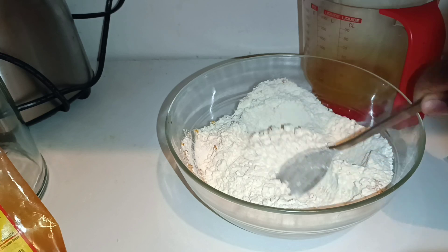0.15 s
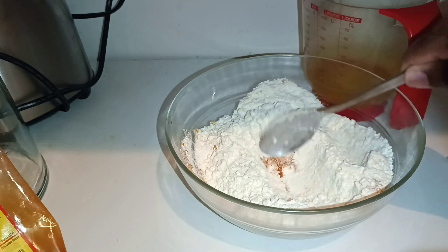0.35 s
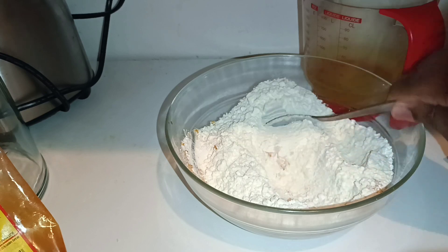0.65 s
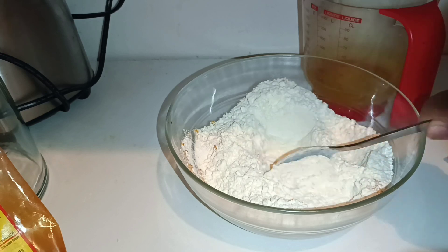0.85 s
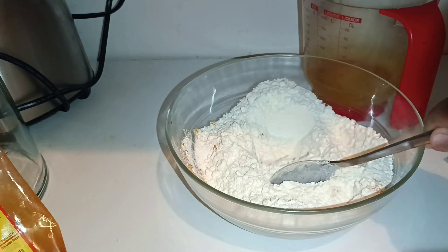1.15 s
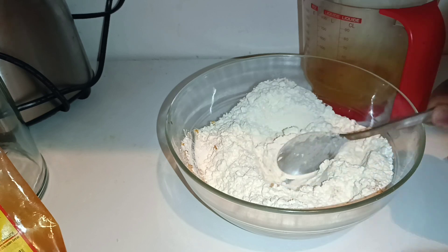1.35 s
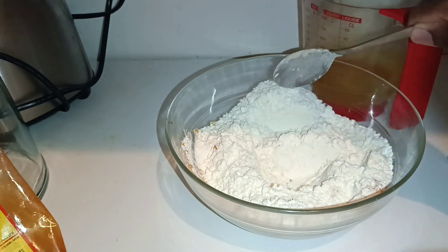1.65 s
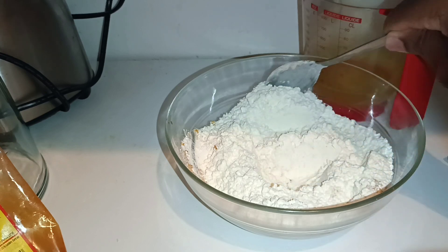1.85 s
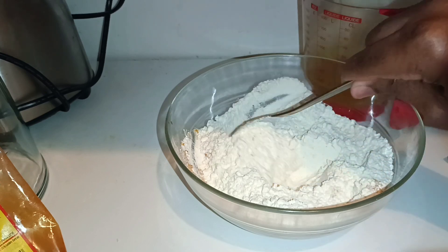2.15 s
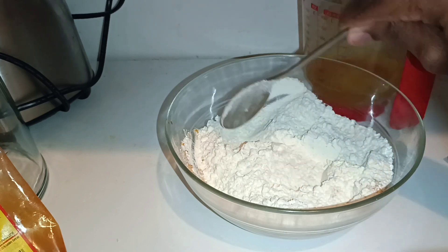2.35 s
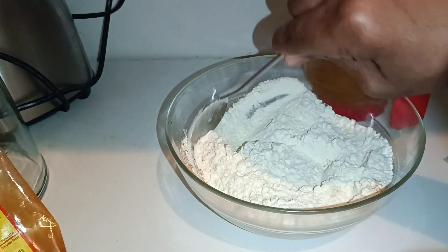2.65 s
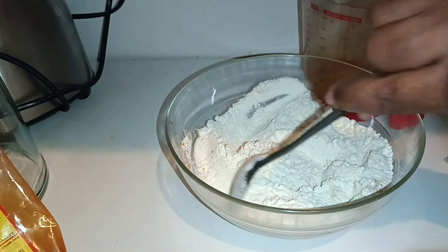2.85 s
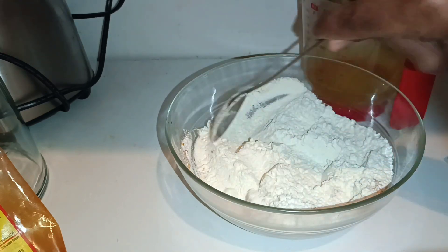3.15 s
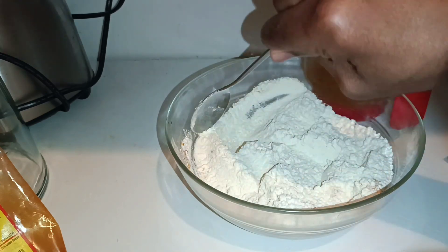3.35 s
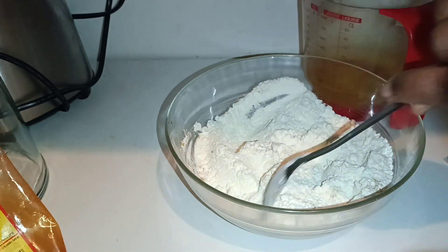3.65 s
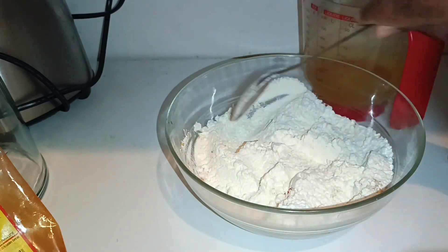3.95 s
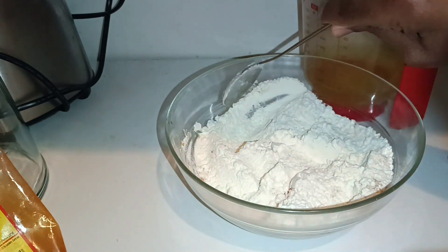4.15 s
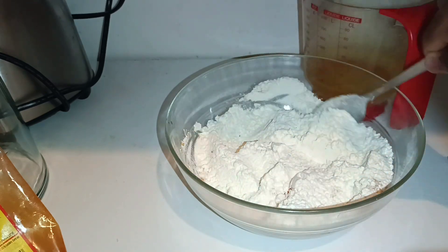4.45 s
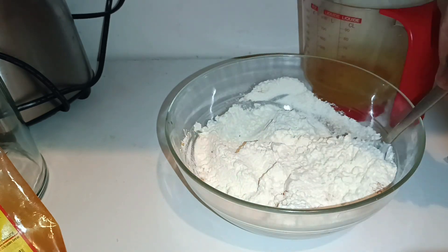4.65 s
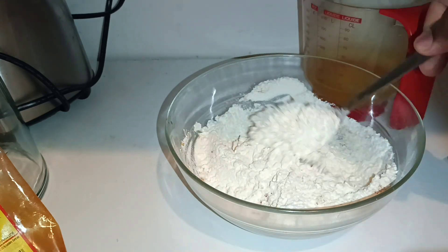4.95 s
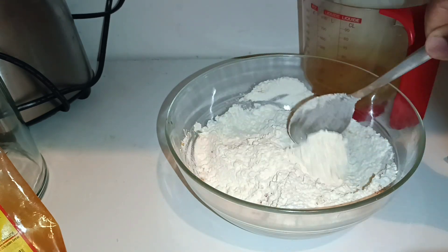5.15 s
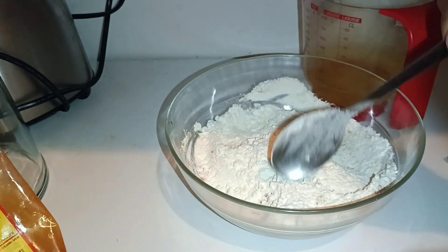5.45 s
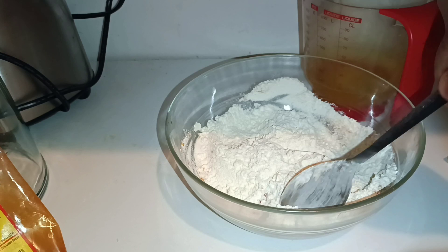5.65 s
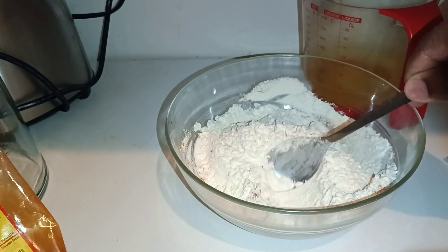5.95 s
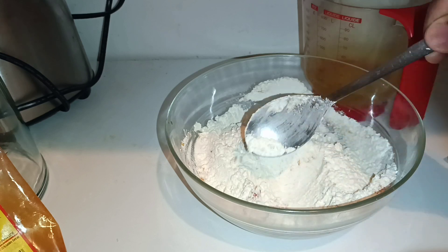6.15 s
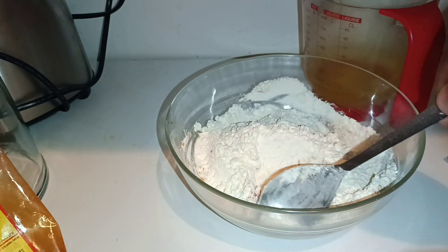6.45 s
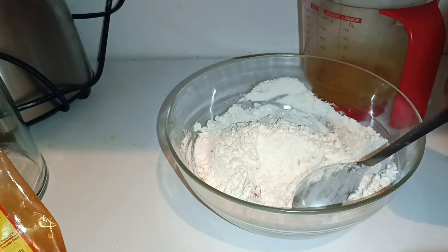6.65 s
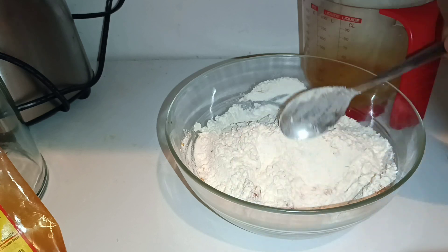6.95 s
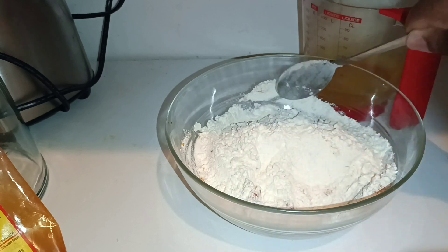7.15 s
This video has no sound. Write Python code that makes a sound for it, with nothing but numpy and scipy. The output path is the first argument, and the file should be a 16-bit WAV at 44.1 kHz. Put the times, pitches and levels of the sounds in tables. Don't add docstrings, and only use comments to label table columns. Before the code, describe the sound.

A quiet small kitchen with faint room air, hiss and a low fridge hum, recorded close in stereo, the right side duller. At 0.1 s a spoon digs into flour in a glass bowl: a cluster of soft low thumps and a muffled knock, with a dull drag at 0.2. Around 0.75 to 0.95 come another thump and dull gritty drags, then a softer push and scrape at 1.3. Thin, brighter scrapes rise at 1.9 to 2.2. At 2.65 a damped tap leads into a long wall scrape; at 3.4 to 3.7 light clinks and thin scrapes follow. At 4.25 the loudest clink rings with a thump and a harsh scrape, trailing into weighty drags and ticks until 4.85. Near quiet follows, with barely audible creaks. A soft thump and faint skim come at 5.8, then a loud ringing clink and thump at 6.5, a low drag to 6.8, and quiet to the end.

```python
import sys
import numpy as np
from scipy import signal
from scipy.fft import rfft, irfft
from scipy.io import wavfile
from scipy.ndimage import uniform_filter1d

SR = 44100
rng = np.random.default_rng(int(sys.argv[2]) if len(sys.argv) > 2 else 0)


def pcm_store(signal):
    levels = np.round(np.clip(np.atleast_2d(signal), -1, 1) * 32767)
    wavfile.write(sys.argv[1], SR, levels.astype(np.int16).T)


def how_loud(loudness_db):
    steps = np.asarray(loudness_db, float) / 20
    return 10 ** steps


N = 321930

# frequency in Hz, level in dB per Hz.
AIR_SPECTRUM = [(30, -39), (50, -16.5), (102, -1), (236, -2), (394, -5), (714, -11), (950, -15.5),
                (2600, -17.5), (7000, -35.5), (8200, -41), (10000, -40.5), (13600, -44), (15000, -22),
                (15800, -27.5)]
AIR_DB = -68.5
# frequency in Hz, likeness from -1 to 1.
AIR_LIKENESS = [(60, 0.16), (180, 0.57), (550, 0.086), (1650, -0.33), (4970, -0.14), (15000, 0.36)]
# frequency in Hz, left over right in dB.
AIR_LEAN = [(60, -4.5), (150, 2), (380, -1), (950, 0.5), (2380, 5.5), (5980, 1), (15000, -2)]
# frequency in Hz, level in dB.
FRIDGE_HUM = [(49.6, -87.5), (99.3, -76), (168, -86.5), (247, -78), (400, -83.5), (738, -90), (2228, -92.5),
              (2327, -93.5)]

# start in seconds, peak in dB, upper modes in dB, build-up in ms,
# damping factor.
THUMPS = [(0.087, -25, 13, 1.67, 0.78), (0.098, -29.5, 0.5, 7, 0.71), (0.119, -27, -17, 5.6, 1.5),
          (0.143, -40.5, 1, 4.1, 1.2), (0.182, -29.5, 7.5, 1.3, 0.77), (0.74, -25, 8, 15.6, 2.8),
          (0.779, -29, -8.5, 1.96, 1.16), (0.851, -51, -5, 11, 0.24), (0.915, -49.5, 8, 2, 1.3),
          (1.278, -40.5, 13, 11.6, 1), (1.31, -38, 1.5, 1.74, 0.48), (2.655, -31, 4, 34, 2.5),
          (2.686, -41.5, -17, 8.4, 2.1), (3.37, -30.5, -8, 11, 0.76), (3.405, -39, 2, 7.3, 0.96),
          (3.445, -48.5, -2, 5.4, 0.95), (4.247, -20.5, -5.5, 8.6, 2), (4.288, -31, -12, 4.2, 0.42),
          (4.538, -55, 24, 19.99, 2.7), (4.757, -46, -5.5, 2.9, 0.74), (5.802, -31.5, 15.5, 5.2, 0.99),
          (5.822, -35, -12.5, 12.5, 0.92), (6.511, -22, 18, 8.8, 1.6), (6.525, -27.5, 8.5, 4.5, 0.63),
          (6.545, -33.5, -5, 2.1, 0.54)]
# frequency in Hz, level in dB, t60 in seconds.
COUNTER_MODES = [(93, -10, .18), (125, -6.5, 0.11), (160.5, 8.5, 0.12), (216.5, -16, 0.13),
                 (238.8, -3, 0.15), (281.6, -3.5, 0.079), (345, -24, 0.15), (435, -17.5, 0.076),
                 (502.5, -20, 0.06)]
TOP_SHARE = 0.3

BOWL_HZ = [555, 618, 734, 964, 1050, 1172, 1852, 1992, 2019, 3015, 2961, 2989, 3413, 4137, 4450, 4934, 5448,
           5954, 6938, 7900, 8560, 9160, 10330, 11300, 12540]
# t60 in seconds, then dB when struck at the far, near and left wall.
BOWL_MODES = [(0.11, -12, -12, -14), (0.38, -12, -12.5, -9), (.21, -33.5, -16, -36), (0.18, -14, -20, 10),
              (0.1, -12.5, -33, -20), (0.27, -19.5, -8.5, 9), (0.0096, -21.5, -29, -13), (0.3, -11, 1, -31),
              (0.52, -1, -7.5, 13), (0.029, -9, -37, -41), (0.56, -15, -18.5, -28), (0.27, -16.5, -1, 3),
              (0.14, -29, -48, -14), (0.194, -17.5, -12, 8), (0.13, -25, -25, -28), (.3, -28, -62.5, -34),
              (0.17, -29, -32, 10.5), (0.25, -30.5, -52.5, -25), (0.6, -19, -54, -6),
              (0.074, -29, -49, -39), (0.21, -25, -49, -20), (0.13, -29, -33, -4), (0.07, -32, -40, 9),
              (0.4, -38.5, -85, -21), (.2, -35, -53, -18)]
# frequency in Hz, t60 in seconds, level in dB.
FLOUR_MODES = [(575, 0.36, -5), (832, 0.043, -3), (956, 0.24, -9), (1258, 0.47, -22.5), (1535, 0.056, -6)]
# frequency in Hz, t60 in seconds, level in dB.
RIM_MODES = [(630, 0.16, -17), (838, 0.12, -11), (930, 0.076, 0.5), (1280, 0.14, -12), (1600, 0.085, 1),
             (2304, 0.18, -8), (2584, 0.16, -1.5), (3550, .15, -8)]
# frequency in Hz, t60 in seconds, level in dB.
HANDLE_MODES = [(681, 0.15, 8), (1466, 0.17, -2), (2735, 0.23, -7), (2980, .15, -6), (4200, 0.126, -32),
                (5580, 0.091, -8), (6700, 0.13, -11)]
# frequency in Hz, level in dB per Hz.
CRACK_SPECTRUM = [(400, -30.5), (1000, -22.5), (2000, -11.5), (4000, -17), (7000, -25), (12000, -31.5),
                  (16000, -29.5)]

# start in seconds, peak in dB, tilt in dB per octave, damping factor,
# crack in dB. All blows and touches below share these columns.
DIGS = [
    (0.084, -30, -2, 19, -28),
    (0.742, -50.5, -1, 1.1, -3.5),
    (0.773, -47.5, 16, 3.3, -21),
    (0.916, -48, -3, 21, -9.5),
    (1.278, -54, -3.5, 0.47, 1.5),
    (5.798, -60.5, -12.5, 0.68, 7.5),
]
RIM_KNOCKS = [
    (0.179, -26.5, -10, 5.5, -3.5),
]
FAR_WALL = [
    (2.1265, -60, -0.5, 1.6, -8),
    (3.5005, -53, 12, 1.4, -19),
    (3.516, -43.5, 5, 2.4, -21),
    (3.637, -52, 9, 1.5, -16),
    (4.246, -13, 2.5, 1.2, -6),
    (4.765, -47.5, 4.5, 3.2, -1),
    (4.7893, -54, 5, 2.5, 4),
]
NEAR_WALL = [
    (6.507, -15, 0.12, 1.2, -3),
]
LEFT_WALL = [
    (2.6505, -49, 0.084, 6, -8.5),
    (3.368, -52, 5, 4.8, -7),
]
HANDLE_TOUCHES = [
    (0.173, -37.5, 0, 2, -7),
    (0.183, -34, 0, 1.8, -2.5),
]
FAR_TOUCHES = [
    (3.511, -55, 6.5, 2.7, 10),
    (4.674, -56, -6, 4, -4),
    (4.786, -67, -8, 3, -2),
]
NEAR_TOUCHES = [
    (6.514, -28.5, -8, 3.7, -12),
]

# frequency in Hz, width in Hz, level in dB.
BURIED = [(780, 82, 8), (1060, 78, -3), (1350, 480, -6), (1545, 46, -7), (2270, 1200, -17.5),
          (4200, 130, -10), (3230, 780, -25), (6740, 480, -16), (9750, 600, -23)]
HEAPED = [(680, 78, 16.5), (1300, 120, 6.5), (1690, 350, 2.5), (2660, 1400, -5.5), (4020, 290, -5),
          (6500, 1100, -16), (9567, 517, -30.5)]
LIFTING = [(1170, 110, -16), (1940, 110, -4), (2960, 160, -7), (4080, 84, -0.5), (6800, 180, -9.5),
           (8070, 90, -6), (8800, 124.6, -30), (10700, 100, -14)]
BARE = [(1218, 110, -3.5), (2000, 35, -1.5), (3000, 48, -2), (4150, 42, -4), (6170, 220, -19.5),
        (6960, 44, -19), (8840, 390, -26), (10500, 300, -21), (11260, 224, -25)]
RESTING = [(487, 27, 11), (1050, 160, -0.5), (2020, 20, -16.5), (2980, 210, 2), (4020, 110, 5.5),
           (5630, 170, -8), (6240, 200, -10.5), (8560, 60, -10.5), (4630, 70, -7), (5950, 80, -7.5),
           (9050, 80, -15.5), (10380, 110, -9.5), (12560, 80, -13)]
LOADED = [(740, 116, 2.5), (990, 174, 5), (1143, 110, 0.5), (1590, 160, 4.5), (3020, 350, 3.5),
          (3729.1, 140, 13), (4950, 67, 11), (5730, 98.4, -2), (6470, 350, 2.5), (10000, 290, -3)]
TIP = [(1122, 75, 7.5), (1830, 82, 7), (2995, 200, 7), (3910, 160, 4), (5900, 60, -18), (6600, 150, -12)]
SKIMMING = [(1213, 27, 2), (9200, 76, -26), (11330, 60, -17)]
SETTLED = [(522, 102, -8), (1210, 40, -13.5), (2090, 27, -29), (2989, 5.2, 16), (4100, 33, 1.5),
           (5800, 380, -17), (9130, 72, -16)]
RISING = [(3000, 90, -7), (3940, 280, -4.5), (5850, 81, -11), (6350, 160, -9), (10430, 240, -12)]

# start in seconds, length in seconds, share of the stroke before full
# pressure, scrape in dB, weight of the low drag in dB. All strokes share these columns.
BURIED_STROKES = [
    (.2, 0.11, .05, -80, 27),
    (.76, 0.2, 0.29, -66.5, 13.5),
    (.87, 0.073, 0.25, -68.5, -4),
]
HEAPED_STROKES = [
    (1.27, 0.14, 0.28, -68.5, 3.1),
    (1.308, 0.12, 0.37, -62, 3.3),
]
LIFTING_STROKES = [
    (2.01, 0.14, 0.41, -63.5, -9),
    (2.052, 0.15, 0.24, -61.5, 1.5),
]
BARE_STROKES = [
    (2.729, 0.3, 0.17, -62.5, -1),
    (2.898, 0.057, 0.46, -81, 5),
    (3.461, 0.079, 1, -54.5, -10.5),
    (3.521, 0.25, 0.13, -66, -4),
    (3.609, 0.16, 0.14, -64, -15),
]
RESTING_STROKES = [
    (4.26, 0.17, 0.08, -39, -1.5),
    (4.38, 0.264, 0.1, -54.5, -3),
]
LOADED_STROKES = [
    (4.51, 0.22, 0.23, -54, 7.6),
    (4.602, 0.138, 0.86, -62.5, 12.2),
]
TIP_STROKES = [
    (4.727, 0.11, 0.51, -47.5, 0),
]
SKIMMING_STROKES = [
    (5.795, 0.14, 0.077, -77, 6.2),
]
SETTLED_STROKES = [
    (6.53, 0.15, 0.16, -65, 22),
    (6.602, 0.18, 0.21, -63.5, 9),
]
RISING_STROKES = [
    (1.871, 0.18, 0.74, -61, -13),
]
# rise of pitch over a stroke in %, treble in dB, ring of the glass in dB.
HANDLING = [
    (2.5, -10, -28),
    (6, -10.5, -21.5),
    (0, -7, -0.5),
    (0.5, -10, -19),
    (-3, -14, 0),
    (1.5, -13.5, -12.5),
    (-3, -40, -15),
    (7.5, 1.5, -3),
    (1.4, -9, -3.5),
    (13, -17.5, -9),
]
ONSET_DB, RELEASE_DB = -13.5, -27
HOLD = 1.334
STEEL_HZ = [5700, 6300, 6700, 7900, 8300, 8600, 9150, 9900, 10350, 11300, 11850, 12700, 15100, 15500]
# time in seconds, boost in dB, length in ms, pitch in Hz.
CATCHES = [(.775, 12, 7.4, 1400), (0.821, 6.5, 9.2, 1180), (.825, 9, 20, 4200), (.875, 8, 30, 4150),
           (.83, 0, 28, 1700), (.89, 16, 27, 1800), (1.282, 1, 8, 2300), (1.31, 11, 12, 7500),
           (1.357, 11.5, 8, 1450), (1.36, 1, 6.5, 6800), (2.032, 6, 24, 4000), (2.076, 0, 11, 3000),
           (1.9, 13, 13, 5800), (1.97, 4, 25, 3900), (2.04, 17, 22, 3000), (2.944, 19, 14, 1290),
           (3.505, 10, 8, 1170), (4.674, 5, 6.5, 1050), (4.58, 5.5, 20, 990), (4.63, 8.5, 17, 950),
           (2.13, 27, 12, 1190), (2.153, 16, 8, 2000), (2.79, 7, 23, 2000), (2.76, 6, 14, 4150),
           (2.805, 7, 13, 3000), (2.79, 15, 23, 10500), (2.87, 0, 19, 6200), (2.9, 19, 48, 9200),
           (3.497, 24, 15, 4430), (3.515, 19, 9, 9200), (3.55, 10, 24, 3000), (3.62, 8, 8.5, 4150),
           (3.64, 2, 8.1, 3000), (3.675, 7, 11, 4150), (4.32, 0.5, 6.9, 3000), (4.423, 11.5, 13, 1024),
           (4.421, 5, 16, 3194), (4.546, 1, 6.4, 1510), (4.556, 10.5, 6, 1600), (4.56, 4, 22, 5500),
           (4.53, 11, 18, 9750), (4.599, 14, 5.9, 1190), (4.654, 6, 8, 910), (4.68, 12.5, 20, 1120),
           (4.68, 17.5, 28, 4370), (4.697, 8, 18, 1110), (4.715, 3.5, 6.3, 1100), (4.764, 12, 8.7, 2290),
           (4.788, 16, 5.1, 2170), (4.82, 21.5, 8, 1800), (5.801, 20, 7.5, 10000), (3.7, 0, 25, 3000),
           (.21, 8, 20, 3500), (6.63, -1.5, 14, 6100), (6.69, 6, 11, 9000)]
BITE = 0.87
CATCH_OCTAVES = 0.45

# start in seconds, peak in dB, pitch in Hz, length in ms.
CREAKS = [
    (.395, -68, 2640, 22),
    (2.25, -64.5, 732, 43),
    (4.82, -63, 416, 39),
    (5.28, -67, 2890, 81),
    (5.47, -68, 2616, 107),
    (5.75, -60.5, 680, 35),
    (6.82, -59.5, 404, 38),
    (6.88, -67.5, 2665, 36),
]
# frequency in Hz, t60 in seconds.
ROOM_DECAY = [(100, 0.18), (500, 0.28), (2000, 0.18), (6000, 0.24), (14000, 0.23)]
# frequency in Hz, level in dB.
PORT_COLOUR = [(6000, -0.5), (7050, -0.5), (7500, -6), (7950, -4), (9500, 3), (11500, -2), (13200, -7.5),
               (15200, 6)]
# frequency in Hz, loss in dB.
RIGHT_SHADE = [(100, 0), (350, 0), (600, 5), (1200, 0), (2400, 3.5), (4400, 19), (8100, 34), (12000, 22),
               (15500, 8)]
MASK_DB, MASK_SPREAD_DB = 31, 3
EDGE_HZ = 15670


def evened(x):
    return x / np.sqrt(np.mean(x ** 2) + 1e-20)


def peaked(x, peak_db):
    return how_loud(peak_db) * x / abs(x).max()


def read(points, hz):
    f, value = np.transpose(points)
    return np.interp(np.log(hz + 1), np.log(f + 1), value)


def colour(x, points):
    hz = np.fft.rfftfreq(len(x), 1 / SR)
    return irfft(rfft(x) * how_loud(read(points, hz)), len(x))


def add(mix, s, sound):
    part = mix[round(s * SR):][:len(sound)]
    part += sound[:len(part)]


def air():
    frames, hz = N // 512 + 5, np.fft.rfftfreq(2048, 1 / SR)
    a, b, c, d, patches = rng.standard_normal((frames, 1025, 5)).T
    patches = evened(uniform_filter1d(uniform_filter1d(patches, 14, 0), 8, 1))
    swell = evened(uniform_filter1d(rng.standard_normal(frames), 25))
    same = np.clip(read(AIR_LIKENESS, hz), -1, 1)[:, None]
    left = a + 1j * b
    right = same * left + np.sqrt(1 - same ** 2) * (c + 1j * d)
    lean = np.array([.5, -.5])[:, None, None] * read(AIR_LEAN, hz)[:, None]
    drift = 1.3 * patches + 2.5 * swell * (hz < 140)[:, None]
    z = np.array([left, right]) * how_loud(read(AIR_SPECTRUM, hz)[:, None] + lean + drift)
    wash = how_loud(AIR_DB) * evened(signal.istft(z, nperseg=2048, noverlap=1536)[1][:, :N])
    t = np.arange(N) / SR
    hum = np.zeros(N)
    for f, db in FRIDGE_HUM:
        waver = rng.standard_normal(40)
        level_db = db + np.interp(t, np.linspace(0, t[-1], 40), waver)
        hum += how_loud(level_db) * np.sin(2 * np.pi * f * t + waver[0])
    return wash + np.sqrt(2) * hum


def ring(hz, t60, db, rise_ms, rattle_db, settle=1, early_db=0, scatter=1):
    t = np.arange(SR // 2) / SR
    turn = .5 + scatter * rng.random((len(hz), 1))
    knots = rng.standard_normal((len(hz), 40))
    rattle = np.array([np.interp(t, np.linspace(0, .5, 40), row) for row in knots])
    level_db = db[:, None] - 60 * (t / t60[:, None]) ** settle
    level_db += rattle_db * np.minimum(t / 0.068, 1) * rattle
    level_db += early_db * np.exp(-(t / 0.022) ** 2)
    modes = how_loud(level_db) * np.sin(2 * np.pi * (hz[:, None] * t + turn))
    return modes.sum(0) * (1 - np.exp(-(t * 1000 / rise_ms) ** 2))


def chatter(ms):
    t = np.arange(5000) / SR * 1000
    landing = t / ms * np.exp(-t / ms)
    shiver = how_loud(-30.5) * np.minimum(t / ms, 1) * np.exp(-t / 22)
    contacts = rng.standard_normal(5000) * how_loud(2.6 * rng.exponential(1, 5000))
    return contacts * (landing + shiver)


def strikes(events, hz, t60, mode_db, rise_ms, chatter_ms, dull_db=0, rattle_db=2.4, early_db=7):
    out = np.zeros(N)
    for s, db, tilt_db, damping, crack_db in events:
        tilted_modes = mode_db + tilt_db * np.log2(hz / 2000)
        body = ring(hz, t60 / damping, tilted_modes, rise_ms, rattle_db, early_db=early_db)
        add(out, s - .002, peaked(body, db))
        tilted_crack = [(f, d + (tilt_db + dull_db) * np.log2(f / 2000)) for f, d in CRACK_SPECTRUM]
        crack = colour(chatter(chatter_ms), tilted_crack)
        add(out, s - .002, peaked(crack, db + crack_db))
    return out


def clinks():
    hz, (t60, far_db, near_db, left_db) = np.array(BOWL_HZ), np.transpose(BOWL_MODES)
    digs = strikes(DIGS, *np.transpose(FLOUR_MODES), 3.9, 14.6)
    rim = strikes(RIM_KNOCKS, *np.transpose(RIM_MODES), 5.7, 1.6)
    far = strikes(FAR_WALL, hz, t60, far_db, 2.9, 4.5, rattle_db=-2.0, early_db=13.0)
    left = strikes(LEFT_WALL, hz, t60, left_db, 5.4, 16.5)
    near = strikes(NEAR_WALL, hz, t60, near_db, 2.7, 2.15, dull_db=-7.5, rattle_db=-6.0, early_db=8.0)
    return digs + rim + far + left + near


def thumps():
    out, (hz, mode_db, t60) = np.zeros(N), np.transpose(COUNTER_MODES)
    upper = (hz > 190) * np.where(hz > 310, TOP_SHARE, 1)
    for s, db, upper_db, ms, damping in THUMPS:
        push = ring(hz, t60 / damping, mode_db + upper_db * upper, ms, 6.9, settle=0.84, scatter=0)
        add(out, s - .004, peaked(push, db))
    return out


def touches():
    hz, (t60, far_db, near_db, _) = np.array(BOWL_HZ), np.transpose(BOWL_MODES)
    handle = strikes(HANDLE_TOUCHES, *np.transpose(HANDLE_MODES), 1.35, 2.1)
    far = strikes(FAR_TOUCHES, hz, t60, far_db, 5.7, 3.8)
    near = strikes(NEAR_TOUCHES, hz, t60, near_db, 1.5, 3.4, dull_db=-8.0, early_db=20.0)
    return handle + far + near


def resonate(x, hz, width, order=1):
    turn = np.exp(2j * np.pi * np.cumsum(hz * np.ones(len(x))) / SR)
    r = np.exp(-np.pi * max(width, 3) / SR)
    return 2 * (turn * signal.lfilter([(1 - r) ** order], np.poly([r] * order), x / turn)).real


def wander(count, ms):
    width = round(ms * SR / 40000)
    coarse = uniform_filter1d(uniform_filter1d(rng.standard_normal(400), width), width)
    return np.interp(np.arange(count) / 40, np.arange(400), evened(coarse))


def snags(t, hz):
    nearby = [c for c in CATCHES if t[0] - .03 < c[0] < t[-1] + .03]
    s, db, ms, near_hz = np.transpose(nearby + [(0, 0, 1, 1000)])[:, :, None]
    coarse = t[::24]
    late = (coarse - s) * 1000 / ms * np.where(coarse < s, BITE, 1)
    octaves = np.log2(hz / near_hz) / CATCH_OCTAVES
    return np.interp(t, coarse, (db * np.exp(-late ** 2 - octaves ** 2)).sum(0))


def stroke(start, length, share, scrape_db, weight_db, load, glide, treble_db, ring_db):
    t = np.arange(0, length, 1 / SR)
    n, now = len(t), start + t
    away = np.interp(t / length, [0, np.clip(share, .02, .98), 1], [-1, 0, 1])
    pressure_db = scrape_db + np.where(away < 0, ONSET_DB, RELEASE_DB) * abs(away) ** HOLD
    grit = rng.standard_normal(n) * how_loud(2.2 * rng.exponential(1, n) + 1.3 * wander(n, 4))
    spoon = np.zeros(n)
    for f, width, db in load:
        hz = f * (1 + np.linspace(-.5, .5, n) * glide / 100 + 0.012 * wander(n, 38))
        tone = resonate(grit * how_loud(snags(now, f)), hz, 1.6 * width, order=2)
        spoon += how_loud(db + 3.2 * wander(n, 20)) * tone
    glass = np.zeros(n)
    for f, (t60, far_db, _, _) in zip(BOWL_HZ[5::2], BOWL_MODES[5::2]):
        tone = evened(resonate(grit * how_loud(snags(now, f)), f, 43.0 / t60))
        glass += how_loud(far_db + 2 * np.log2(f / 2000)) * tone
    steel = np.zeros(n)
    for f in STEEL_HZ * rng.uniform(.99, 1.01, len(STEEL_HZ)):
        steel += how_loud(4 * wander(n, 25) + snags(now, f)) * resonate(grit, f, 100, order=2)
    sound = evened(spoon) + how_loud(ring_db) * evened(glass) + how_loud(-13.0) * evened(steel)
    sound += how_loud(-35) * evened(grit)

    def band(low_hz, high_hz):
        sos = signal.butter(3, (low_hz, high_hz), "band", fs=SR, output="sos")
        return evened(signal.sosfilt(sos, sound))

    edge = how_loud(weight_db) * band(420, 2400) + band(2400, 7500) + how_loud(treble_db) * band(7500, 15800)
    return how_loud(pressure_db) * edge * signal.windows.tukey(n, .25)


def scrapes():
    out = np.zeros(N)
    loads = BURIED, HEAPED, LIFTING, BARE, RESTING, LOADED, TIP, SKIMMING, SETTLED, RISING
    tables = (BURIED_STROKES, HEAPED_STROKES, LIFTING_STROKES, BARE_STROKES, RESTING_STROKES,
              LOADED_STROKES, TIP_STROKES, SKIMMING_STROKES, SETTLED_STROKES, RISING_STROKES)
    for load, rows, handling in zip(loads, tables, HANDLING):
        for row in rows:
            add(out, row[0], stroke(*row, load, *handling))
    return out


def creaks():
    out = np.zeros(N)
    for s, db, hz, ms in CREAKS:
        note = resonate(rng.standard_normal(4000), hz, 8.4)[:round(ms * SR / 1000)]
        add(out, s, peaked(note * np.hanning(len(note)), db))
    return out


def room(x):
    taps = np.zeros((2, SR // 2))
    grid = np.arange(130, SR // 2 - 20, 20)
    at = grid + rng.integers(0, 20, (2, len(grid)))
    np.put_along_axis(taps, at, rng.choice([-1., 1.], at.shape), 1)
    hz, t, z = signal.stft(taps, SR, nperseg=256)
    decay = how_loud(-60 * t / read(ROOM_DECAY, hz)[:, None])
    tail = signal.istft(z * decay, SR, nperseg=256)[1]
    return signal.fftconvolve(x[None], tail / np.linalg.norm(tail[0]), axes=1)[:, :N]


def scene():
    bright = colour(clinks() + touches() + scrapes() + creaks(), PORT_COLOUR)
    low = thumps()
    low = low + how_loud(-10) * room(low)
    near = bright * how_loud([[2.4], [.6]]) + how_loud([[-5.5], [-.6]]) * room(bright) + low
    near = signal.sosfilt(signal.butter(2, 80, "high", fs=SR, output="sos"), near)
    right = colour(np.roll(near[1], 3), [(f, -loss_db) for f, loss_db in RIGHT_SHADE])
    return np.array([near[0], right]) + air()


def masked(x):
    hz, t, z = signal.stft(x, SR, nperseg=1024, noverlap=768)
    power = uniform_filter1d(abs(z) ** 2, size=5, axis=2)
    treble = (hz > 3500) & (hz < 14300)
    loud_db = 10 * np.log10(power[:, treble].sum(1).max(0) + 1e-20)
    band = np.arange(len(hz)) // 12
    band_db = 10 * np.log10(np.add.reduceat(power, np.arange(0, len(hz), 12), axis=1) + 1e-20)
    whim_db = MASK_SPREAD_DB * evened(uniform_filter1d(rng.standard_normal(band_db.shape), size=14, axis=2))
    weak = (band_db + whim_db < loud_db - MASK_DB)[:, band]
    weak = weak & ((hz > 4600) & (hz < 14300))[:, None]
    return signal.istft(z * np.where(weak, .05, 1), SR, nperseg=1024, noverlap=768)[1][:, :N]


def top_cut(x):
    return signal.sosfilt(signal.butter(12, 16300, fs=SR, output="sos"), x)


def record(dry):
    limited = signal.oaconvolve(masked(dry), signal.firwin(255, EDGE_HZ, fs=SR)[None], "same")
    return top_cut(limited)


dry = scene()
out = record(dry)
pcm_store(out)
```